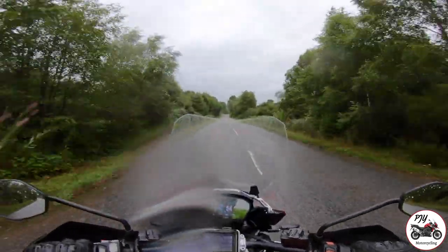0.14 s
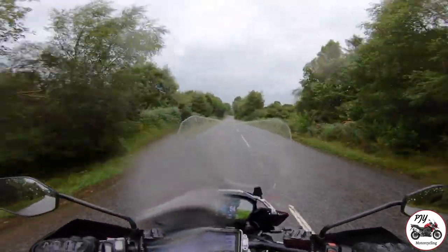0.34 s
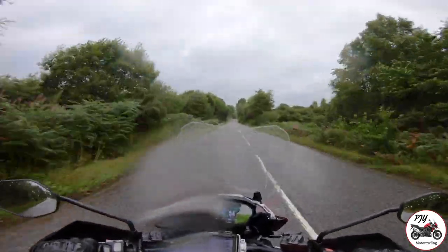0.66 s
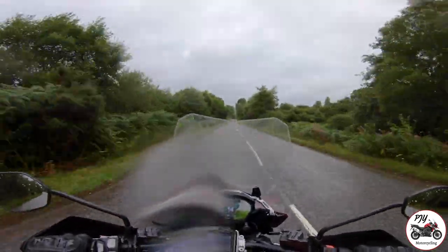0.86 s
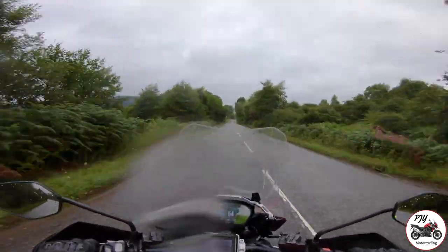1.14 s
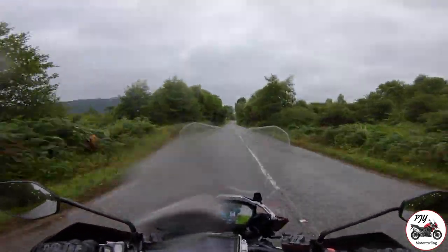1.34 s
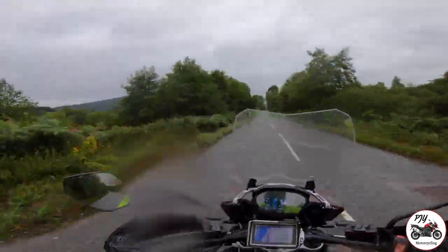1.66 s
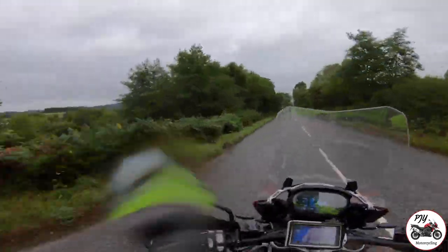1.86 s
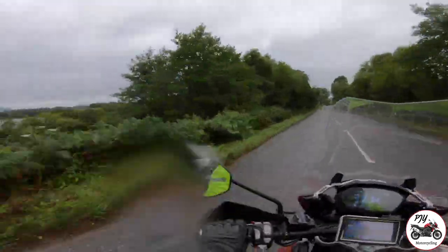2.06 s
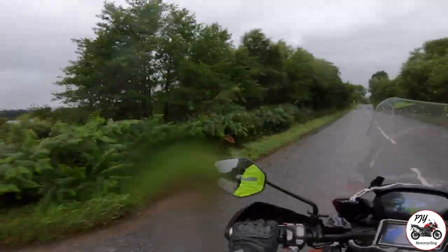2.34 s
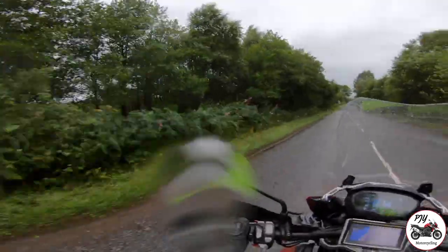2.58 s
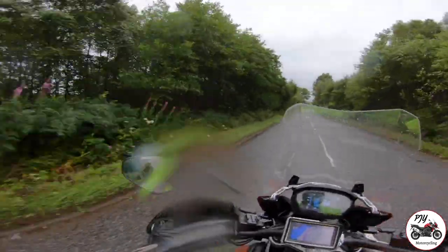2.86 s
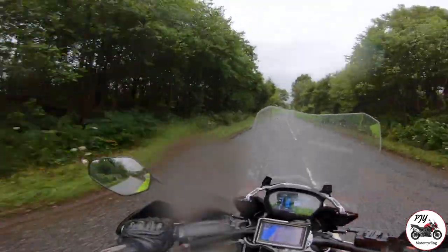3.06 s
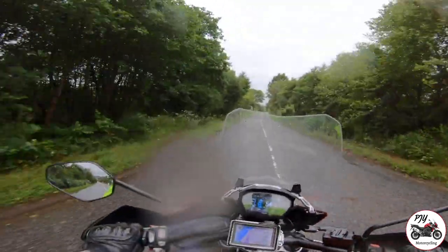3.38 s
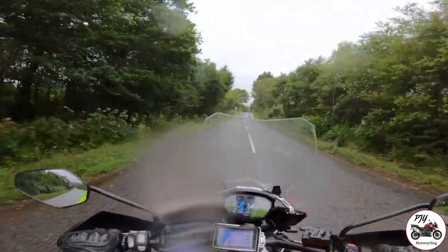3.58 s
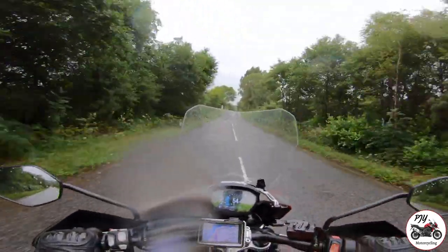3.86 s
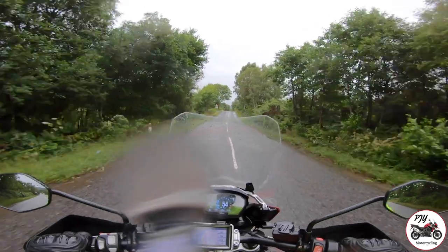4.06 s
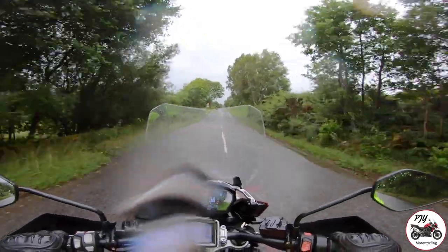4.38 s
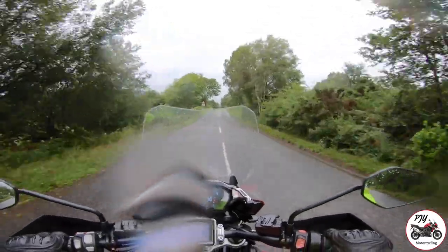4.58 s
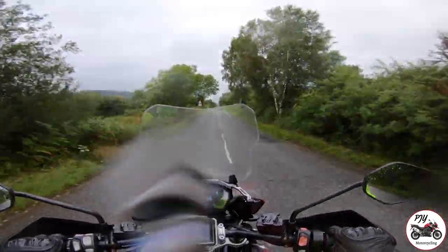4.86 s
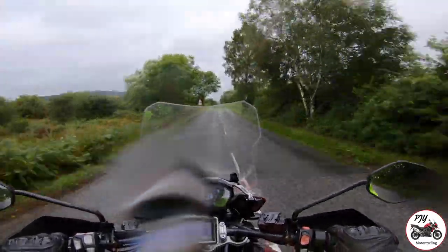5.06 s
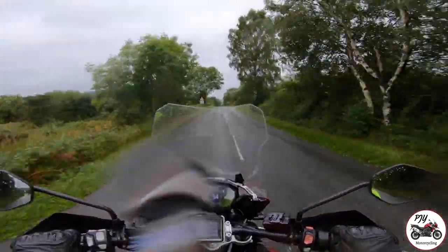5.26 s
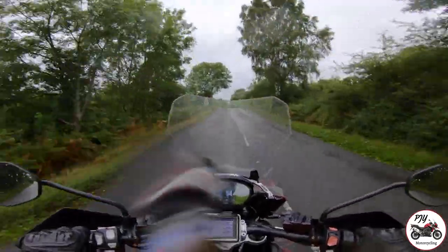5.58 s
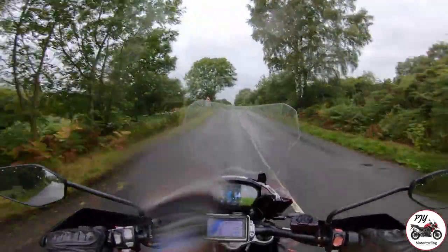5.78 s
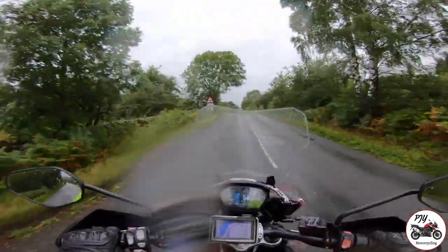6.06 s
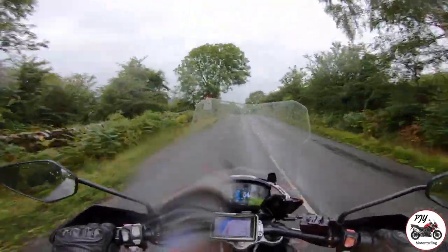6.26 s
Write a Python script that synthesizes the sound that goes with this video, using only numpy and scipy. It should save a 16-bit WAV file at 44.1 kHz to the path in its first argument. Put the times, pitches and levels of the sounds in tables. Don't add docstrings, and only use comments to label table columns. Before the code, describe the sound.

Heard from the rider's helmet, thumping wind and a constant engine hum dominate, with wet tyres hissing and drops tapping the camera shell.

```python
import sys
import numpy as np
from scipy import signal
from scipy.fft import rfft, irfft
from scipy.io import wavfile
from scipy.ndimage import uniform_filter1d

SR = 44100
rng = np.random.default_rng(int(sys.argv[2]) if len(sys.argv) > 2 else 0)


def output_pcm(signal):
    pcm = np.clip(np.atleast_2d(signal).T, -1, 1) * 32767
    wavfile.write(sys.argv[1], SR, np.round(pcm).astype(np.int16))


def boost_factor(decibels):
    exponent = np.asarray(decibels, float) / 20
    return 10 ** exponent


N = 283246

# (time [s], engine cycle rate [Hz], throttle [dB], gear load [dB])
ENGINE = [(0.0, 25.147, 1, 0), (0.66, 25.17, 1, 0), (1.38, 25.115, -1, -1), (2.1, 25.005, 1, 1),
          (2.82, 24.97, -1, 2), (3.54, 24.98, 0, 2), (4.26, 25.0, -1, 1), (4.98, 25.015, 0, -2),
          (5.34, 24.97, -2, -5), (5.7, 24.895, -1, -2), (6.42, 24.747, -2, 0)]
EXHAUST_ORDERS = [3, 6, 9, 12, 15]
EXHAUST_DB = [0.5, -35.5, -11, -10.5, -21]
GEAR_ORDERS = [25.36, 28.8, 33.6, 54.6, 67.2, 86.4, 134.4]
GEAR_DB = [-21.5, -14, 1, -14.5, -10, -22, -32]
CHAIN_ORDERS = [38, 57.6]
CHAIN_DB = [3, -4]

# (time [s], airflow [dB], water [dB])
RIDE = [(0.0, -30, -34.5), (0.37, -25, -31), (1.27, -27.5, -34), (1.47, -22, -34.5), (1.5, -29, -34),
        (1.81, -25.5, -33), (2.32, -29.5, -33), (2.95, -28.5, -34), (2.97, -26, -32), (3.45, -25, -30),
        (4.0, -23, -30), (4.04, -27, -31), (4.45, -24.5, -31.5), (4.79, -29, -33), (5.15, -25.5, -30),
        (5.22, -28, -32.5), (5.54, -29.5, -33.5), (6.42, -24, -31)]
# (time [s], strength, negative in a lull [dB], length [s])
GUSTS = [(0.286, 5.5, 0.038), (0.553, 1.5, 0.11), (0.753, -7, 0.079), (0.936, 4.5, 0.077),
         (1.127, -6.5, 0.031), (1.32, 3.5, 0.033), (1.718, 5.5, 0.14), (2.04, 10.5, 0.046),
         (2.456, 7.5, 0.044), (2.303, 2, .08), (2.657, 7, 0.059), (3.05, 3.5, 0.061), (3.18, -2, .06),
         (3.278, 5, 0.12), (3.43, 1.5, .04), (3.64, -2, 0.045), (3.722, -2, 0.072), (3.854, 8, 0.041),
         (4.215, -9, 0.043), (4.504, 5, 0.04), (4.617, -1, 0.052), (4.89, 2.5, 0.092), (5.128, 9.5, 0.074),
         (5.496, 2, .1), (5.856, 3, 0.051), (6.06, 4, 0.055), (6.194, 2, 0.051)]
# (frequency [Hz], level [dB])
BUFFET_COLOUR = [(2.4, -36), (4, 0), (16, 1.5), (30, -8), (49, -13), (65, -19), (90, -24), (200, -52)]
# (frequency [Hz], level [dB])
THRUM_COLOUR = [(40, -41), (65, 5), (85, 5.5), (100, 5.5), (135, 5), (200, 4.5), (250, -10.5), (400, -63)]
# (frequency [Hz], level [dB])
ROAR_COLOUR = [(120, -21.5), (190, -10.5), (240, 0), (300, -1.5), (436, -2.5), (520, -8), (620, -16),
               (800, -36.5), (1500, -92.5)]
# (frequency [Hz], level [dB])
TYRE_COLOUR = [(400, -31.5), (620, -15.5), (700, -0.5), (780, -3), (950, -2), (1100, -5), (1400, -6.5),
               (1560, -12), (1870, -16.5), (2400, -18.5), (4000, -69)]
# (frequency [Hz], level [dB])
SPRAY_COLOUR = [(1000, -24), (1560, -5.5), (1870, -3.5), (2100, 3), (2500, -2.5), (3020, -12.5), (3400, -8),
                (4050, -10.5), (4450, -23.5), (5400, -38.5), (7000, -65.5)]

# (time [s], peak [dB], shell ring [dB], bright edge [dB])
DROPS = [(0.4942, -29, -6, -28), (0.5684, -32, 9, -19), (0.7285, -29.5, -16, -27.5),
         (0.7708, -34.5, 2, -24.5), (0.9862, -36, -6, -23), (1.2386, -37.5, -3, -27),
         (1.2717, -32.5, -7, -30), (1.7437, -33.5, -1.5, -19), (1.9869, -34, -5, -19),
         (2.1023, -28, -14, -23), (2.122, -29.5, -10, -25), (2.2003, -36, 1.5, -17.5),
         (2.3383, -32, 3, -26), (2.3565, -27, 0, -21), (2.362, -33, -1, -28), (2.4684, -26.5, -13, -19.5),
         (2.5614, -38, 8, -27), (2.7175, -33, -9, -22), (2.7712, -36.5, 1, -20.5), (2.922, -36, 1.5, -22),
         (2.9462, -35.5, -2, -16), (3.501, -36.5, 3, -21.5), (3.6661, -36, -4, -15),
         (3.6875, -34, -3, -19.5), (4.235, -37, 6, -22.5), (4.842, -35.5, 6, -30),
         (5.2278, -30.5, -12, -27), (6.3037, -22, -9, -43.5)]
# (time [s], peak [dB])
DROPLETS = [(0.0356, -38), (0.9155, -40), (1.038, -35), (1.3773, -39), (2.0347, -38), (2.384, -40),
            (2.5062, -37), (2.8672, -41), (2.9033, -39.5), (3.002, -38), (3.3917, -37), (3.4445, -33),
            (3.655, -41), (3.7276, -39), (3.733, -38), (3.7928, -37), (3.964, -41), (4.1956, -42.5),
            (4.342, -34.5), (4.542, -39), (5.311, -38), (5.4031, -34.5), (5.4197, -40), (5.496, -39),
            (5.612, -36), (5.7913, -37), (5.837, -35.5), (5.867, -36.5), (6.0611, -37.5), (6.2716, -42)]
# (time [s], level [dB], deep body [dB], sharp edge [dB], snap [dB])
KNOCKS = [
    (.9895, -26, 20, 2, 4),
    (.991, -29, 7, 3, 7),
    (2.4312, -20.5, 1, -3, -3),
    (3.3552, -29.5, 10, -6, 20),
    (3.3572, -31, 9, -8, 20),
    (3.6985, -36, 3, -4, 0),
]
# (frequency [Hz], level [dB])
DROP_COLOUR = [(900, -30.5), (1900, -8), (2600, -1), (3100, 1.5), (3900, 12), (4600, 2.5), (5400, -2),
               (7000, -10), (9500, -20), (10600, -34.5), (15500, -40)]
# (frequency [Hz], level [dB])
MIST_COLOUR = [(3500, -26.5), (4500, 2), (5000, 1), (5440, -1), (7000, -10.5), (8400, -21), (9500, -30),
               (10500, -48), (12500, -61.5), (16000, -65)]
# (frequency [Hz], level [dB])
HAZE_COLOUR = [(7500, -21), (9200, 5), (10500, 1), (12500, -2.5), (13500, -25)]
# (frequency [Hz], level [dB])
SHEEN_COLOUR = [(11800, -23), (12800, -1), (16000, 0)]
# (frequency [Hz], width [Hz], level [dB])
SLIPSTREAM = [
    (4100, 520, -48.5),
    (9200, 1700, -78.5),
]
# (time [s], depth of the dip, negative for a lift [dB], hold [s])
DUCKS = [
    (1.035, 2.5, 0.098),
    (4.537, 0.5, 0.039),
    (5.251, -1, 0.037),
]

FIRING_DB, WHINE_DB = -25.5, -38.5
VALVE_DB, VALVE_HZ, VALVE_WIDTH_HZ = -39, 1680, 1090
CHAIN_TAUT_DB, CHAIN_SLACK_DB, SLACKENS_S, SLACKEN_LENGTH_S = -47.5, -48.5, 1.9, 0.36
USUAL_FLOW_DB, USUAL_WET_DB = -27, -33
TURN_S, TURN_LENGTH_S = 2.32, 0.78
MIST_DB, MIST_PER_DROP_DB, SHOWER_S = -54.5, 0.3, 0.25
PUDDLE_S, PUDDLE_DB, PUDDLE_LENGTH_S = 3.2, 4, 0.14
HAZE_DB, HAZE_PATCHY_DB = -80.5, 2
SHEEN_DB, SHEEN_GAP_DB = -85, -22
DRIZZLE_PER_S = 60
CONTACT_S, SPLASH_MS, TRICKLE_DB = 0.0012, 1.3, -16
KNOCK_HZ, RING_HZ, SNAP_HZ = 2560, 3540, 9500
KNOCK_DB, KNOCK_PER_DB = 1.5, 0.18
DUCK_ATTACK_S, DUCK_RELEASE_S = 0.01, 0.072
DRIVE = 0.7


def colour(points):
    hz, db = np.transpose(points)
    log_hz = np.log(np.maximum(np.fft.rfftfreq(N, 1 / SR), 1))
    gain = boost_factor(np.interp(log_hz, np.log(hz), db, right=-np.inf))
    noise = irfft(rfft(rng.standard_normal(N)) * gain, N)
    return noise / noise.std()


def columns(table):
    s, *values = np.transpose(table)
    return [np.interp(np.arange(N) / SR, s, v) for v in values]


def walk(rate):
    hold = int(SR / rate)
    steps = np.repeat(rng.standard_normal(N // hold + 1), hold)
    level = uniform_filter1d(uniform_filter1d(steps, hold), hold)[:N]
    return level / level.std()


def band(x, hz, width_hz):
    b, a = signal.iirpeak(min(hz, 0.45 * SR), hz / width_hz, SR)
    return signal.lfilter(b, a, x)


def bumps(times, sizes, lengths_s):
    t = np.arange(N) / SR
    return sum(size * np.exp(-((t - s) / length) ** 2) for s, size, length in zip(times, sizes, lengths_s))


def ride():
    flow_db, wet_db = columns(RIDE)
    return flow_db - USUAL_FLOW_DB, wet_db - USUAL_WET_DB


def turn():
    return np.exp(-((np.arange(N) / SR - TURN_S) / TURN_LENGTH_S) ** 4)


def tones(cycles, orders, dbs, waver_db):
    total = np.zeros(N)
    for order, db, start in zip(orders, dbs, rng.random(len(orders))):
        level = np.sqrt(2) * boost_factor(db + waver_db * walk(2.01))
        total += level * np.sin(2 * np.pi * (order * cycles + start))
    return total


def valve_clatter(cycles):
    pattern = rng.standard_normal(1764)
    clatter = np.interp(cycles % 1 * len(pattern), np.arange(len(pattern)), pattern)
    valves = band(band(clatter, VALVE_HZ, VALVE_WIDTH_HZ), VALVE_HZ, VALVE_WIDTH_HZ)
    valves = signal.sosfilt(signal.butter(4, 5000, fs=SR, output="sos"), valves)
    return boost_factor(VALVE_DB) * valves / valves.std()


def engine():
    hz, throttle_db, load_db = columns(ENGINE)
    cycles = np.cumsum(hz) / SR
    exhaust = boost_factor(FIRING_DB + 0.59 * throttle_db) * tones(cycles, EXHAUST_ORDERS, EXHAUST_DB, waver_db=1.5)
    exhaust *= boost_factor(0.25 * bumps(*np.transpose(GUSTS)) + 0.35 * ride()[0])
    gears = boost_factor(WHINE_DB + 0.7 * load_db) * tones(cycles, GEAR_ORDERS, GEAR_DB, waver_db=1.6)
    slack = 0.5 + 0.5 * np.tanh((np.arange(N) / SR - SLACKENS_S) / SLACKEN_LENGTH_S)
    chain_db = CHAIN_TAUT_DB + slack * (CHAIN_SLACK_DB - CHAIN_TAUT_DB)
    chain = boost_factor(chain_db) * tones(cycles, CHAIN_ORDERS, CHAIN_DB, waver_db=1.0)
    return exhaust + gears + chain + valve_clatter(cycles)


def wind():
    flicker = walk(12)
    flow_db = ride()[0]
    gust_db = bumps(*np.transpose(GUSTS))
    swings = colour(BUFFET_COLOUR)
    reach = uniform_filter1d(uniform_filter1d(swings ** 2, size=3000), size=3000)
    evened = swings / (reach + 0.06) ** 0.49
    buffet = boost_factor(-14.5 + 0.23 * flow_db + 0.36 * gust_db + 1.05 * walk(10)) * evened
    thrum = boost_factor(-31.5 + 0.86 * flow_db + gust_db + 2.0 * flicker) * colour(THRUM_COLOUR)
    roar = boost_factor(-27.0 + 0.67 * flow_db + 0.16 * gust_db + 0.58 * flicker) * colour(ROAR_COLOUR)
    return buffet + thrum + roar


def road():
    flow_db, wet_db = ride()
    tyre_db = -30.5 + 0.26 * flow_db + 0.6 * wet_db + 2.1 * turn() + 0.38 * walk(11)
    spray_db = -33.0 + 0.96 * wet_db - 1.5 * turn() + 0.53 * walk(24.76)
    return boost_factor(tyre_db) * colour(TYRE_COLOUR) + boost_factor(spray_db) * colour(SPRAY_COLOUR)


def shell_response(ring_db, tilt_db, knock_db, snap_db):
    octave = np.log2(np.maximum(np.fft.rfftfreq(1024, 1 / SR), 1))
    hz, shell_db = np.transpose(DROP_COLOUR)
    gain_db = np.interp(octave, np.log2(hz), shell_db)
    gain_db += tilt_db * np.clip(octave - np.log2(5400), 0, None)
    gain_db += knock_db * np.exp(-((octave - np.log2(KNOCK_HZ)) / 0.23) ** 2)
    gain_db += ring_db * np.exp(-((octave - np.log2(RING_HZ)) / 0.2) ** 2)
    gain_db += snap_db * np.clip((octave - np.log2(SNAP_HZ)) / 0.3, 0, 1)
    cepstrum = irfft(np.log(boost_factor(gain_db)))
    cepstrum[1:512] *= 2
    cepstrum[513:] = 0
    return np.exp(rfft(cepstrum))


def add_drop(out, s, db, ring_db, tilt_db, splash_ms, knock_db, splash, snap_db=0):
    ms = 1000 * np.arange(len(splash)) / SR
    tap = splash * (np.exp(-ms / max(splash_ms, 0.1)) + boost_factor(TRICKLE_DB) * np.exp(-ms / 7))
    tap[0] += 4.2
    tap /= np.sqrt(np.sum(tap ** 2))
    sound = irfft(shell_response(ring_db, tilt_db, knock_db, snap_db) * rfft(tap, 1024))
    i = min(int((s + CONTACT_S) * SR), N - 1)
    out[i:i + len(sound)] += boost_factor(db + 26.5) * sound[:N - i]


def add_large_drops(out):
    splashes = rng.standard_normal((len(DROPS), 900))
    for (s, db, ring_db, edge_db), splash in zip(DROPS, splashes):
        ring_db = np.clip(ring_db + 4.5, -9, 11)
        tilt_db = np.clip(edge_db + 20.5, -24, 4)
        knock_db = KNOCK_DB + KNOCK_PER_DB * (db + 29)
        add_drop(out, s, db + 0.5, ring_db, tilt_db, SPLASH_MS, knock_db, splash)


def add_droplets(out):
    splashes = rng.standard_normal((len(DROPLETS), 900))
    for (s, db), splash in zip(DROPLETS, splashes):
        add_drop(out, s, db + 0.5, 2.5, -5, SPLASH_MS, 3, splash)


def add_knocks(out):
    splashes = rng.standard_normal((len(KNOCKS), 900))
    for (s, db, body_db, edge_db, snap_db), splash in zip(KNOCKS, splashes):
        add_drop(out, s, db + 1.5, 2 - 0.6 * body_db, edge_db, 1.3, body_db, 0.4 * splash, snap_db)


def add_drizzle(out):
    count = int(DRIZZLE_PER_S * N / SR)
    chances = rng.random((count, 3))
    splashes = rng.standard_normal((count, 300))
    for (when, size, bright), splash in zip(chances, splashes):
        db = -53 - 2.9 * np.log(1 - 0.97 * size)
        add_drop(out, when * (N - 1) / SR, db, 1.5, 6 * bright - 2.5, 0.7, -3, splash)


def rain():
    times = np.transpose(DROPS)[0]
    shower_db = bumps(times, np.full(len(times), MIST_PER_DROP_DB), np.full(len(times), SHOWER_S))
    shower_db += bumps([PUDDLE_S], [PUDDLE_DB], [PUDDLE_LENGTH_S])
    mist_db = MIST_DB + shower_db + 0.4 * ride()[1] + 1.2 * walk(30) + 0.74 * walk(3.5)
    out = boost_factor(mist_db) * colour(MIST_COLOUR)
    add_large_drops(out)
    add_droplets(out)
    add_knocks(out)
    add_drizzle(out)
    gaps = np.clip(3 * (walk(22) - 0.95), 0, 1)
    sheen = boost_factor(SHEEN_DB + SHEEN_GAP_DB * gaps + 0.4 * shower_db) * colour(SHEEN_COLOUR)
    haze_db = HAZE_DB + 0.5 * shower_db + HAZE_PATCHY_DB * walk(9) + 1.5 * walk(35)
    return out + sheen + boost_factor(haze_db) * colour(HAZE_COLOUR)


def slipstream():
    hiss = np.zeros(N)
    for hz, width_hz, db in SLIPSTREAM:
        air = band(band(rng.standard_normal(N), hz, width_hz), hz, width_hz)
        hiss += boost_factor(db + 2.3 * walk(9.6)) * np.sqrt(SR / width_hz) * air
    return turn() * hiss


def scene():
    return (engine() + wind() + road() + rain() + slipstream())[None]


def top_cut(x):
    return signal.sosfilt(signal.butter(12, 15830, fs=SR, output="sos"), x)


def record(dry):
    t = np.arange(N) / SR
    duck_db = np.zeros(N)
    for s, depth_db, hold_s in DUCKS:
        corners_s = np.cumsum([0, DUCK_ATTACK_S, hold_s, DUCK_RELEASE_S])
        duck_db += np.interp(t - s, corners_s, [0, depth_db, depth_db, 0])
    rounded = np.tanh(DRIVE * dry * boost_factor(-duck_db)) / DRIVE
    return top_cut(boost_factor(-0.98) * rounded)


dry = scene()
out = record(dry)
output_pcm(out)
```